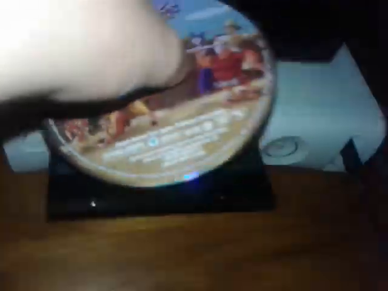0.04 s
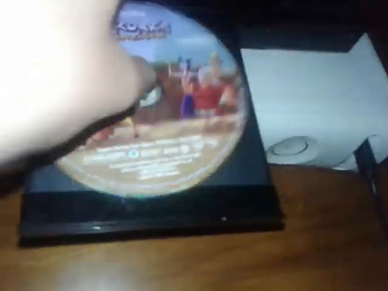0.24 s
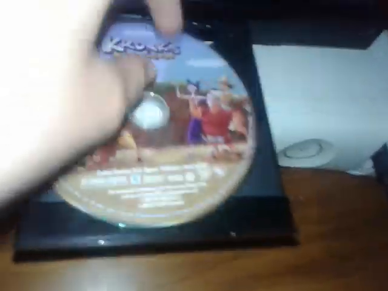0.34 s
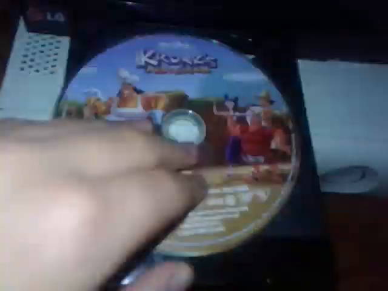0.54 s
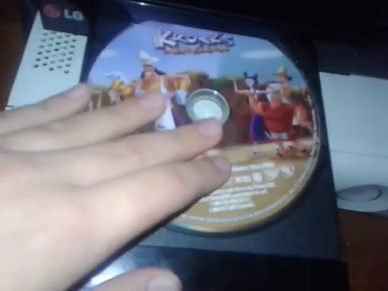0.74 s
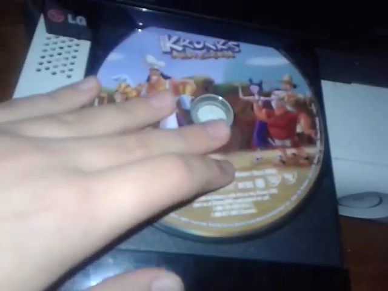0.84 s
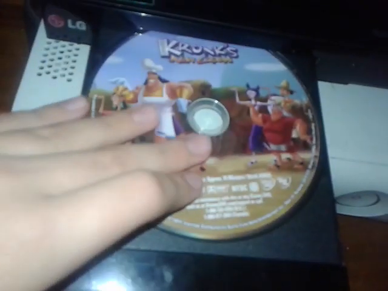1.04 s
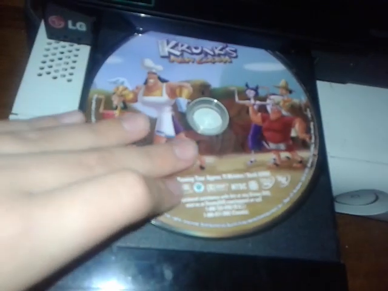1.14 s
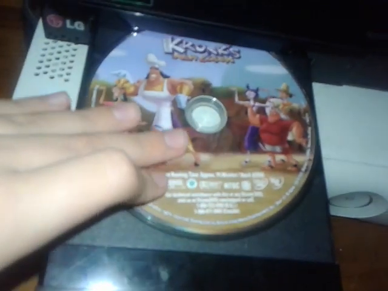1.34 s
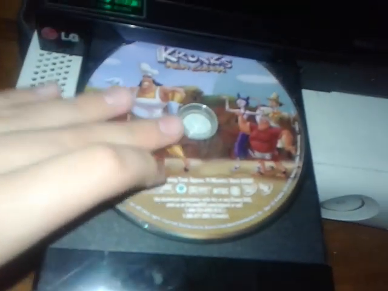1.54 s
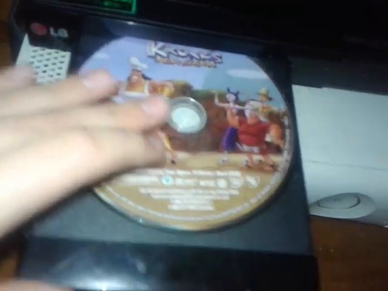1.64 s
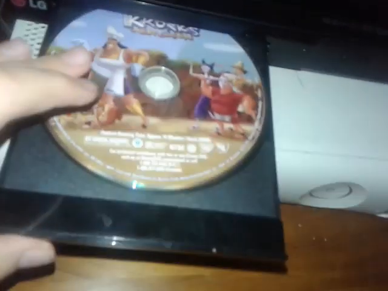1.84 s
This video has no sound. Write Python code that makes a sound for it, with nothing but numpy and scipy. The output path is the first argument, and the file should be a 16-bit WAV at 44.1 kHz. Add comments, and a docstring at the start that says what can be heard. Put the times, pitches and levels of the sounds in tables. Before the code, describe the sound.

Close up indoors, hard plastic ticks and scrapes as a disc is seated in a tray, then duller finger knocks, sparse faint touches and a soft closing brush, over quiet machine whirr and hiss.

```python
"""Disc laid in an open tray

A plastic disc, close and a little to the right, ticks and clatters on a player's tray: decaying modes and noise.
It slides, then fingers rub it lightly: friction noise with catches; fingertips tap it and a hand brushes off.
Soft thuds and low booms swell and die; the blows carry a short room ring of noise fading band by band.
Behind them are coloured hiss, the player's whirr, a thin high whine and a low drone that stops early."""
import sys
import numpy as np
from scipy import signal
from scipy.fft import rfft, irfft
from scipy.io import wavfile
from scipy.ndimage import uniform_filter1d

SR = 44100
rng = np.random.default_rng(int(sys.argv[2]) if len(sys.argv) > 2 else 0)


def waveform_to_disk(signal):
    """Save audio, clipped to [-1, 1], as 16-bit WAV at the path in sys.argv[1]."""
    frames = np.transpose(np.atleast_2d(signal))
    scaled = np.clip(frames, -1, 1) * 32767
    samples = np.round(scaled).astype(np.int16)
    wavfile.write(sys.argv[1], SR, samples)


N = 83790
EVENT_SIZE = 16384  # samples in one blow, thud or boom

# die-away of the plastic and of the room: f/Hz, plastic t60/s, room t60/s, room level/dB
DECAY_BANDS = [(91, 0.039, 0.54, -7.5), (245, 0.011, 0.28, -10), (694, 0.031, 0.25, -13),
               (1860, 0.051, 0.12, -9), (3850, 0.044, 0.2, -32), (9100, 0.031, 0.24, -19)]
# share of a source's pan that each frequency takes: f/Hz, share (a factor)
PAN_BY_PITCH = [(150, .01), (400, 0.27), (1000, 0.23), (2500, 1.66), (5000, 0.47), (9000, 0.14)]


def clacks(room):
    """Impact excitation: a hard, brief contact of disc and tray excites modes up into the treble."""
    # disc striking the tray: t/s, body level/dB, contact ring f/Hz, contact ring/dB, thud/dB, sharp edge/dB,
    # disc ring/dB, pan left over right/dB
    clack_rows = [ (0.2057, -23.5, 3240, 13, -7, -1, -22, -8), (0.2190, -29, 3240, 12, 10, -12, -23, -14),
                  (0.2301, -28.5, 2335, 9, 10, -15, -32, -7), (0.2982, -33, 2294, 13, -1.5, -7, -1.5, -7.5),
                  (0.3272, -17.5, 3730, 1, -12, -0.5, 3.5, -10),
                  (0.3321, -17, 4230, 5.5, 8.5, -3.5, -3, -4), (0.342, -19.5, 3420, 13, -13, 5, -10, -19),
                  (0.3490, -22.5, 2130, 10.5, 8, -3, -13, -7.5),
                  (0.355, -24, 1945, 2, 12.5, -13, 5.5, -3.5), (0.368, -28, 3520, 6, 4, -1, 3, -10),
                  (0.3964, -17, 3380, 17, -16, 4.5, -28, -19), (0.423, -21.5, 3780, 7, -6, 10, -4.5, -35),
                  (0.4300, -15, 2652, 7, -16, 5, -5.5, -6), (0.4345, -18, 2410, 12, -8, -9, -0.5, -25),
                  (0.4462, -18, 3200, -12, -16, -5, -6, -2), (0.4590, -18.5, 2430, 0, 1, -4, -24, -7),
                  (0.5147, -16.5, 3270, 7, -11, 9.5, -4.5, -10.5),
                  (0.529, -20.5, 4190, 9.5, -9, -3, -4.5, -13), (0.5421, -18, 3815, 3.5, -14, -7, -10, -14),
                  (0.6026, -18, 3860, -2.5, -7.5, 3, -4.5, -6), (0.6250, -31, 4200, -2, 8, -17, -20, -7)]
    # spectral colour of a clack: f/Hz, relative level/dB
    clack_colour = [(20, -55), (65, -40), (130, -21.5), (230, -14), (380, -6.5), (740, -11.5), (1500, -9),
                    (2500, -4), (2900, -2), (4000, 1), (5000, -8), (7000, -20.5), (11000, -31),
                    (16000, -33.5)]
    # modes around the contact point: multiple of the contact ring f, level/dB
    clack_modes = [(0.658, -6.5), (.81, -7), (0.976, -6), (1.004, 0), (1.351, -13)]
    attack_s = 0.00063
    out = np.zeros((2, N))
    for start, *row in clack_rows:
        add(out, start, blow(clack_colour, clack_modes, room, *row, attack_s))
    return out


def taps(room):
    """Damped impact: fingers on the seated disc give duller knocks, with the outer contact modes damped."""
    # knocks under the fingers: t/s, body level/dB, contact ring f/Hz, contact ring/dB, thud/dB,
    # sharp edge/dB, contact time/s
    tap_rows = [ (0.7145, -24.5, 1163, -3.5, -1.5, -2, 0.0019), (0.7179, -29.5, 2604, 0, 1.5, -5, 0.0003),
                (0.756, -36, 1643, 10, 4, 4, 0.00054), (0.8310, -28.5, 3100, -5, -4.5, -8, 0.00079),
                (0.84, -25, 980, -2, 3, 3.5, 0.0002), (0.8689, -37.5, 1070, -20, 12.5, -23, 0.00053),
                (1.0533, -34, 1194, 12, -15, -13, 0.00022), (1.055, -32.5, 2590, 4, -5, -7, 0.00018),
                (1.173, -49, 1530, -8, 17, 5, 0.002), (1.2904, -42.5, 2816, 9.5, 10.5, -3, 0.0012),
                (1.405, -48, 1560, 1.5, 17, -7, 0.0023), (1.543, -53, 1440, 3, 11, 4, 0.0053),
                (1.613, -44.5, 2310, 3.5, 10.5, -26, 0.0029), (1.7010, -40.5, 390, 0, 12.5, 5, 0.0036)]
    # spectral colour of a tap: f/Hz, relative level/dB
    tap_colour = [(20, -41), (60, -31), (130, -8.5), (350, 1), (800, 0), (1700, 3), (3000, 1), (4400, 0.5),
                  (5600, -13), (9000, -26), (16000, -34.5)]
    # modes around the contact point: multiple of the contact ring f, level/dB
    tap_modes = [(.94, -11.5), (1, -2)]
    disc_db, pan_db = -23, -6.5
    out = np.zeros((2, N))
    for start, *row, contact_s in tap_rows:
        add(out, start, blow(tap_colour, tap_modes, room, *row, disc_db, pan_db, contact_s))
    return out


def blow(points, modes, room, db, ring_hz, ring_db, thud_db, edge_db, disc_db, pan_db, contact_s):
    """Modal response to impact: crack, dense plastic modes, contact-point ring, disc modes and room."""
    crack_db, crack_t60_s = 1.5, 0.012
    contact_ring_db, contact_t60_s, contact_width_hz = -15.5, 0.036, 880
    size = room.shape[1]
    t, hz = np.arange(size) / SR, bins(size)

    crack = undb(crack_db) * fade(t, crack_t60_s) * noise(size)
    ring = 0
    for ratio, mode_db in modes:
        cycles = ratio * ring_hz * t + rng.random((2, 1))  # a random phase on each side
        ring = ring + undb(ring_db + contact_ring_db + mode_db) * np.sin(2 * np.pi * cycles)
    ring = ring * fade(t, contact_t60_s)
    plastic = die_away([(f, t60, 0) for f, t60, _, _ in DECAY_BANDS], size)
    body = (crack + ring + plastic + room) * (1 - np.exp(-t / contact_s))

    resonance = 0.33 * ring_db / (1 + (2 * (hz - ring_hz) / contact_width_hz) ** 2)
    low_shelf = thud_db / (1 + (hz / 750) ** 2)
    high_shelf = edge_db * (1 - 1 / (1 + (hz / 5500) ** 4))
    body = colour(body, points, pan_db, resonance + low_shelf + high_shelf)
    body = body / np.sqrt(np.mean(body[:, :SR // 128] ** 2))  # unit rms over the first 8 ms
    return undb(db) * (body + undb(disc_db) * disc_ring(t, pan_db))


def disc_ring(t, pan_db):
    """Modal vibration of the loose disc: its modes waver as it rocks on the tray and sag as it settles."""
    # modes of the loose disc: f/Hz, level/dB, t60/s
    disc_modes = [(213.8, -27.5, 0.7), (403, -19, 0.085), (947, -12, 0.14), (980.3, -8, 0.14),
                  (1014.5, -15, 0.12), (2320, -16, 0.13), (2728, -14, 0.22), (3160, -16.5, 0.18),
                  (3446, -20.5, 0.2), (3910, -17.5, 0.12), (4620, -19.5, 0.18)]
    waver_hz, rock_per_s, sag_hz_per_s, rise_s = 13, 100, 170, 0.0015
    rock = walk(rock_per_s, size=len(t))
    drift = np.cumsum(waver_hz * rock - sag_hz_per_s * t) / SR  # cycles, common to all modes
    ring = 0
    for f, db, t60 in disc_modes:
        level_chance, phase_chance = rng.standard_normal(2)
        tone = np.sin(2 * np.pi * (f * t + drift + phase_chance))
        gain = undb(db + 2 * level_chance) * sides(pan_db * across(PAN_BY_PITCH, f))
        ring = ring + gain * fade(t, t60) * tone
    return ring * (1 - np.exp(-t / rise_s))


def room_ring():
    """Reverberation: dense modes whose decay time depends on frequency."""
    delay_s = 0.002  # time constant of the room's onset
    tail = die_away([(f, t60, db) for f, _, t60, db in DECAY_BANDS], EVENT_SIZE)
    return tail * (1 - np.exp(-np.arange(EVENT_SIZE) / SR / delay_s))


def slide_and_finger_rub():
    """Sliding friction: the disc slides in the tray, then fingers rub lightly on it."""
    # course of the sliding and finger rubbing: t/s, level/dB
    friction_curve = [(.21, -36.5), (.25, -44), (.32, -43.5), (.40, -29), (.50, -32.5), (.57, -28),
                      (.65, -37.5), (.70, -31.5), (.75, -42), (.82, -40), (.87, -53.5), (.97, -63),
                      (1.03, -59.5), (1.052, -43.5), (1.11, -57), (1.33, -75), (1.395, -51.5), (1.45, -70)]
    # spectral colour: f/Hz, relative level/dB
    friction_colour = [(20, -15), (55, -22.5), (100, -9), (300, -7), (700, -3.5), (1500, -2), (2600, 0.5),
                       (4400, -1), (5500, -18.5), (8000, -28.5), (16000, -53)]
    return rub(friction_curve, friction_colour, pan_db=-5.5)


def brush():
    """Sliding friction of the hand brushing off the disc."""
    # course of the brushing: t/s, level/dB
    brush_curve = [(1.65, -68), (1.695, -49), (1.715, -45), (1.76, -40.5), (1.80, -37.5), (1.84, -35),
                   (1.875, -40), (1.9, -49)]
    # spectral colour: f/Hz, relative level/dB
    brush_colour = [(20, -22), (150, -2), (400, -5), (700, -4), (1300, -4), (1800, 6), (2400, 4.5),
                    (3100, -1.5), (4100, -0.5), (5200, -16.5), (8000, -29.5), (16000, -39)]
    return rub(brush_curve, brush_colour, pan_db=-7)


def rub(curve, points, pan_db):
    """Stick-slip friction: a fine hiss, and separate catches of uneven strength that ring the plastic."""
    catches_per_s, catch_t60_s, catch_share = 800, 0.03, 0.55  # the share is one of power
    ring_size = 4096
    times, db = np.array(curve).T
    pressure = undb(np.interp(np.arange(N) / SR, times, db, left=-np.inf, right=db[-1]))
    catches = (rng.random(N) < catches_per_s / SR) * rng.standard_normal(N)
    plastic = noise(ring_size) * fade(np.arange(ring_size) / SR, catch_t60_s)
    grain = signal.fftconvolve(catches[None] * pressure, plastic)[:, :N]
    grain = grain / np.sqrt(np.mean(catches ** 2) * np.sum(plastic ** 2) / 2)
    fine = noise(N) * pressure
    return colour(np.sqrt(catch_share) * grain + np.sqrt(1 - catch_share) * fine, points, pan_db)


def thuds():
    """Damped low-frequency impact: soft pats of the hand on disc and tray."""
    # pats: t/s, centre f/Hz, peak level/dB
    thud_rows = [(0.002, 195, -40.5), (0.066, 110, -46.5), (0.097, 181, -45.5), (0.726, 456, -34.5),
                 (0.838, 780, -30.5), (1.064, 485, -39), (1.543, 280, -47.5), (1.702, 345, -39.5),
                 (1.620, 440, -44)]
    out, t = np.zeros((2, N)), np.arange(EVENT_SIZE) / SR
    for start, hz, db in thud_rows:
        add(out, start, thud(t, hz, db))
    return out


def thud(t, hz, db):
    """Band-limited transient: a cluster of low modes swells and dies quickly."""
    width, rise_s, t60_s = 0.5, 0.0041, 0.13  # width as a share of the centre frequency
    band = 1 / (1 + ((bins(len(t)) - hz) / (width * hz / 2)) ** 4)
    body = irfft(rfft(noise(len(t))) * band)
    body = body * (1 - np.exp(-t / rise_s)) * fade(t, t60_s)
    return undb(db) * body / np.abs(body).max()


def booms():
    """Damped single-mode resonance: the tray booms low as it is pressed down."""
    # booms: t/s, f/Hz, sine amplitude ahead of its envelope/dB
    boom_rows = [(0.432, 142.5, -39), (0.608, 98, -41.5), (0.849, 132.8, -37.5), (1.291, 137.3, -42),
                 (1.621, 115, -46.5)]
    rise_s, t60_s = 0.028, 0.27
    out, t = np.zeros((2, N)), np.arange(EVENT_SIZE) / SR
    envelope = (1 - np.exp(-t / rise_s)) * fade(t, t60_s)
    for start, hz, db in boom_rows:
        add(out, start, undb(db) * envelope * np.sin(2 * np.pi * hz * t))
    return out


def whirr():
    """Amplitude-modulated band noise: the player's unsteady whirr comes up as the disc goes in."""
    # spectral colour: f/Hz, relative level/dB
    whirr_colour = [(100, -23), (330, -8.5), (500, 6), (620, -14), (1400, -33), (1850, -7), (2080, 9.5),
                    (2450, -11), (4300, -35), (6000, -41)]
    level_db, pan_db, start_s, rise_s = -60.5, -3.5, 0.16, 0.2
    unsteady = noise(N) * undb(0.5 * walk(14))
    rise = np.clip((np.arange(N) / SR - start_s) / rise_s, 0, 1)
    return undb(level_db) * colour(unsteady, whirr_colour, pan_db) * rise


def whine():
    """Frequency and amplitude modulation: a thin high sine wavers a little in pitch and level."""
    # course of the whine: t/s, rms level ahead of the wavering/dB
    whine_curve = [(.6, -63.5), (1.1, -74.5), (1.6, -66.5)]
    pitch_hz, wobble_hz = 15736, 10
    level_db = np.interp(np.arange(N) / SR, *np.array(whine_curve).T) + 3.5 * walk(50)
    cycles = np.cumsum(pitch_hz + wobble_hz * walk(60)) / SR
    return np.sqrt(2) * undb(level_db) * np.sin(2 * np.pi * cycles)


def drone():
    """Additive synthesis: low sines waver independently in pitch and level, then stop early."""
    # partials: f/Hz, rms level ahead of the wavering/dB
    drone_partials = [(50, -58), (145, -69.5), (185, -63.5)]
    end_s, fade_s = 0.31, 0.04
    total = np.zeros(N)
    for hz, db in drone_partials:
        level = undb(db + 2 * walk(38.5))
        cycles = np.cumsum(hz * (1 + 0.051 * walk(39.6))) / SR
        total += level * np.sin(2 * np.pi * cycles)
    return np.sqrt(2) * total * np.clip((end_s - np.arange(N) / SR) / fade_s, 0, 1)


def hiss():
    """Stationary coloured noise: the steady background of machine and room."""
    # spectral colour: f/Hz, relative level/dB
    floor_colour = [(25, -25), (50, -2), (130, 0), (230, -2), (400, -1.5), (650, -10), (1400, -11.5),
                    (2500, -11), (4300, -15.5), (5400, -21), (10000, -25.5), (16000, -23)]
    level_db, pan_db = -59.5, -3.5
    return undb(level_db) * colour(noise(N), floor_colour, pan_db)


def undb(db):
    """Logarithmic level: decibels to amplitude gain."""
    return 10 ** (np.asarray(db) / 20)


def across(points, hz):
    """Logarithmic pitch scale: read a table by interpolation over log frequency."""
    p = np.array(points)
    return np.interp(np.log(hz + 1), np.log(p[:, 0]), p[:, 1])


def bins(size):
    """Discrete Fourier analysis: the frequencies of a spectrum in Hz."""
    return np.arange(size // 2 + 1) * SR / size


def sides(pan_db):
    """Level-difference stereo: left and right gains of constant total power."""
    g = undb(np.array([pan_db, -pan_db]) / 2).reshape(2, -1)
    return g / np.sqrt(np.mean(g ** 2, axis=0))


def noise(size):
    """Interchannel coherence: alike in the bass, partly opposed near 2 kHz, unrelated in the high treble."""
    # likeness of left and right: f/Hz, correlation (-1 to 1)
    likeness = [(100, 0.84), (500, 0.89), (1000, 0.54), (2200, -.3), (5000, 0.04), (12000, 0)]
    like = np.clip(across(likeness, bins(size)), -1, 1)
    shares = np.sqrt(np.array([1 + like, 1 - like]) / 2)
    mid, side = rfft(rng.standard_normal((2, size))) * shares
    return irfft(np.array([mid + side, mid - side]), size)


def colour(x, points, pan_db, extra_db=0):
    """Minimum-phase filtering: a unit-power colour table, then extra emphasis and a pan."""
    size = x.shape[-1]
    hz = bins(size)
    gain = undb(across(points, hz))
    gain = gain / np.sqrt(np.mean(gain ** 2)) * undb(extra_db)
    # folding the cepstrum onto positive times makes the filter causal
    cepstrum = irfft(np.log(gain), size)
    cepstrum[1:size // 2] *= 2
    cepstrum[size // 2 + 1:] = 0
    response = np.exp(rfft(cepstrum))
    return irfft(rfft(x) * response * sides(pan_db * across(PAN_BY_PITCH, hz)), size)


def walk(rate, size=N):
    """Low-pass random modulation: levels held 1 / rate s, then smoothed to a spread of 1."""
    k = max(int(SR / rate), 1)
    held = rng.standard_normal(size // k + 1)[np.arange(size) // k]
    w = uniform_filter1d(held, k)
    return w / np.std(w)


def fade(t, t60):
    """Exponential decay: the level falls 60 dB in t60 seconds."""
    return np.exp(-np.log(1000) * t / t60)


def die_away(bands, size):
    """Frequency-dependent damping: dense modes fade band by band; rows are f/Hz, t60/s, level/dB."""
    t, hz, grain = np.arange(size) / SR, bins(size), rfft(noise(size))
    centres = [band[0] for band in bands]
    total = 0
    for share, (_, t60, db) in zip(np.eye(len(bands)), bands):
        weight = across(list(zip(centres, share)), hz)  # one at its own centre, zero at the others
        total = total + irfft(grain * weight, size) * undb(db) * fade(t, t60)
    return total


def add(out, start, sound):
    """Linear superposition: mix a sound in at its time in seconds."""
    i = int(start * SR)
    part = sound[..., :N - i]
    out[:, i:i + part.shape[-1]] += part


def scene():
    """Superposition of the blows with their room ring, the friction, the thuds and the background."""
    room = room_ring()
    handling = clacks(room) + taps(room) + slide_and_finger_rub() + brush() + thuds() + booms()
    return handling + whirr() + whine() + drone() + hiss()


def record(dry):
    """Band limiting: the recorder stops at full scale and cuts the top."""
    top_hz = 16500
    low_pass = signal.ellip(8, 0.2, 70, top_hz, fs=SR, output="sos")
    return signal.sosfilt(low_pass, np.clip(dry, -1, 1))


dry = scene()
out = record(dry)
waveform_to_disk(out)
```